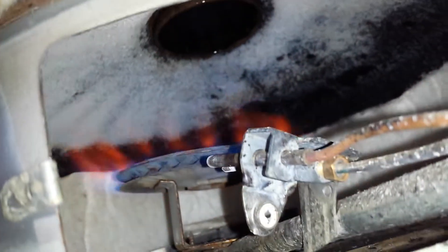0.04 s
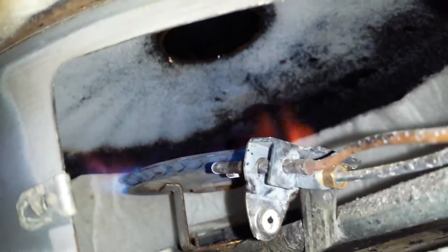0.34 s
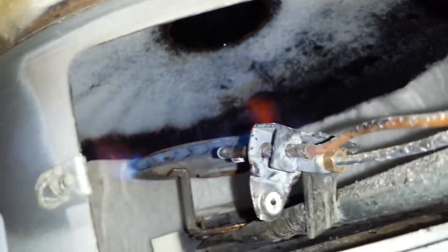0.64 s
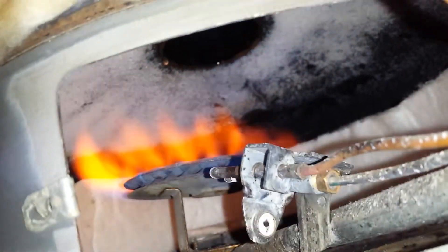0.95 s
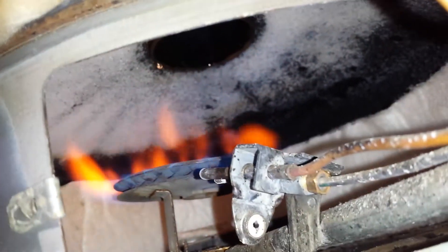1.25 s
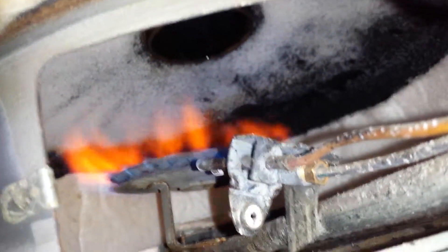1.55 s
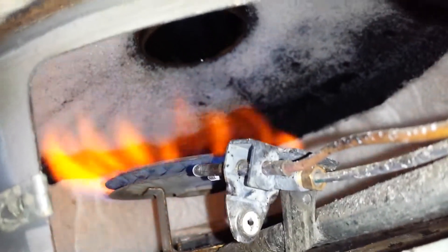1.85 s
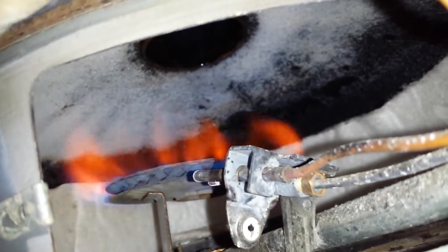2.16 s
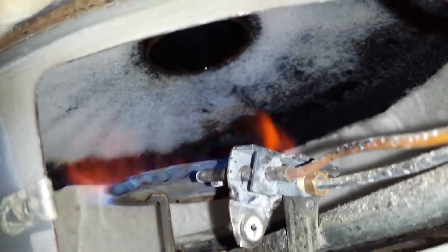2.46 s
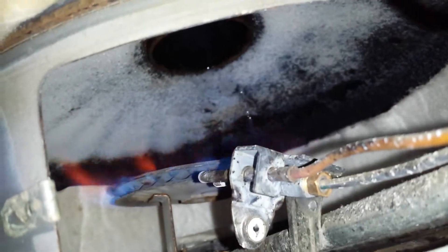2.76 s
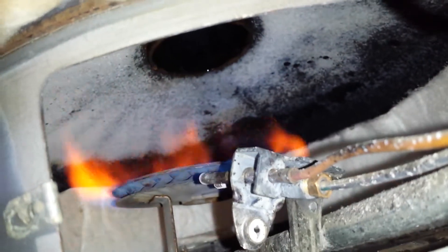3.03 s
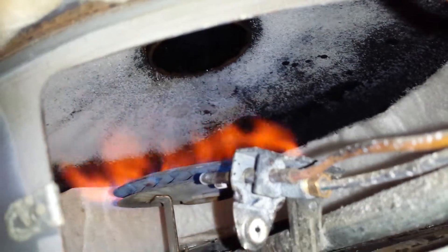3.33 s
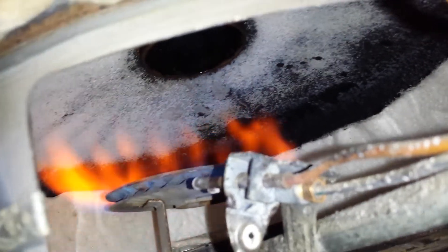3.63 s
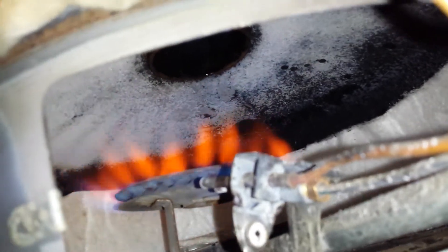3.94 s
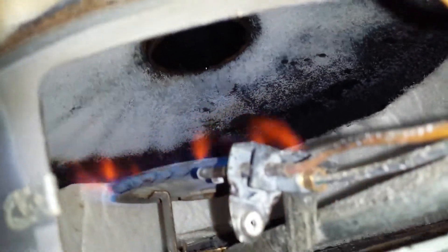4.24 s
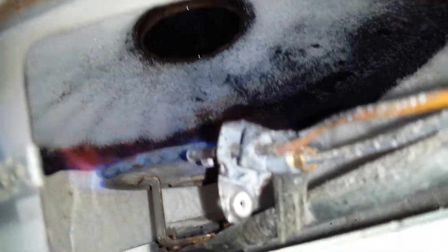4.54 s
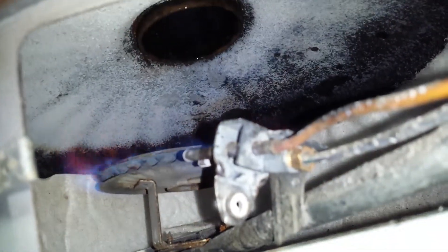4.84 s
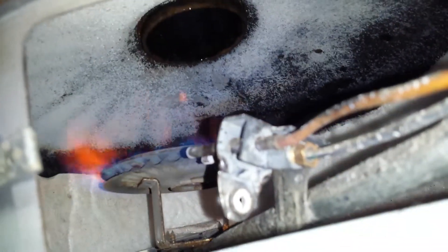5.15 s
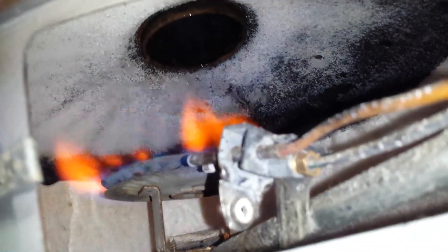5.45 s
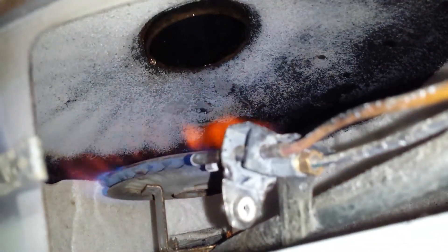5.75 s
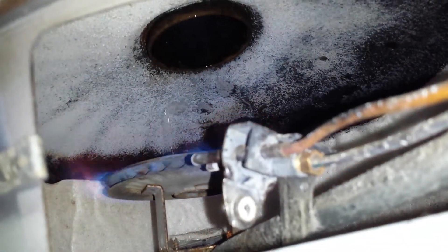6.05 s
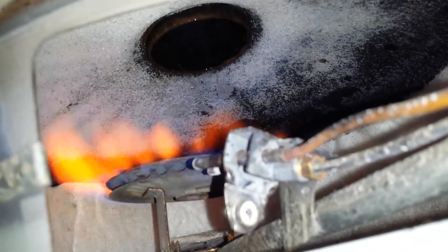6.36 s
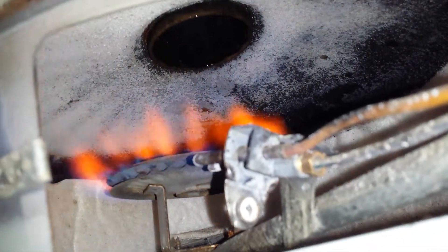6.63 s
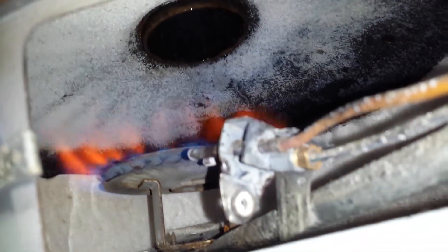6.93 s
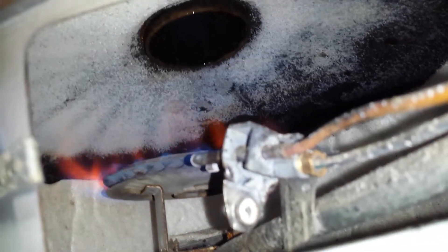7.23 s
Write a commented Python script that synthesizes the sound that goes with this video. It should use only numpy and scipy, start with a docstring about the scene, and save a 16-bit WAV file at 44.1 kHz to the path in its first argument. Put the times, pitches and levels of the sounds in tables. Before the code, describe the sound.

Water drips tick sharply and irregularly onto a hot gas burner, cutting through the deep, wavering rumble of its flames.

```python
"""Just outside the open combustion chamber of a gas water heater. The flames rumble in the
chamber's resonances over the hiss and whistle of the gas jet. Water drips onto the hot burner:
each drop spits, makes the flame thump, and boils away in a faint sizzle."""
import sys
import numpy as np
from scipy import signal
from scipy.fft import rfft, irfft, next_fast_len
from scipy.io import wavfile
from scipy.ndimage import uniform_filter1d, minimum_filter1d

SR = 44100
rng = np.random.default_rng(int(sys.argv[2]) if len(sys.argv) > 2 else 0)


def dump_mix(stems):
    """Bounce the given channels to the path in sys.argv[1] as a 16-bit WAV at rate SR."""
    frames = np.atleast_2d(stems).T  # one column per channel
    limited = np.clip(frames, -1, 1)  # hard clip at full scale
    pcm = np.round(limited * 32767).astype(np.int16)
    wavfile.write(sys.argv[1], SR, pcm)


N = 321489
TIME = np.arange(N) / SR
WALL_RIPPLE = rng.standard_normal((2, 400))  # one pattern per side, common to all sources

# Large drops. Each row: peak time in seconds, spit in dB, half length in seconds, thump in dB,
# treble in dB.
DROPS = [(0.012, -29, 0.0097, -19, -3), (0.094, -35, .005, -14, -2), (0.192, -31, 0.0077, -14.5, -7),
         (0.266, -34.5, 0.0056, -28, -5), (0.537, -33.5, 0.0098, -11.5, -3), (0.618, -34.5, .0023, -14, -7),
         (0.667, -25.5, .006, -6, -7), (0.737, -36.5, .0045, -14.5, -7), (0.876, -33, 0.0053, -13, -8),
         (1.025, -26, .003, -10, -6), (1.125, -33.5, 0.0039, -15.5, -7), (1.179, -28, 0.0069, -16, -3),
         (1.278, -33, .016, -8.5, 0), (1.371, -33, 0.0041, -16.5, -11), (1.503, -30.5, 0.0078, -19, -1),
         (1.604, -32.5, 0.0037, -17, -12), (1.694, -30.5, 0.003, -17.5, -5), (1.714, -27, 0.0034, -20, -9),
         (1.855, -28.5, 0.0028, -33, -5), (1.919, -35.5, 0.0034, -21.5, -1), (2.441, -30, 0.0027, -15, -5),
         (2.489, -35, 0.0062, -16.5, -10), (2.562, -37.5, 0.0047, -21.5, -8), (2.891, -34, 0.0023, -23, 3),
         (3.108, -31, 0.0058, -14, -4), (3.226, -29.5, 0.0065, -17, -1), (3.317, -28.5, 0.0024, -16, -11),
         (3.505, -30, 0.005, -11, -7), (3.589, -33, 0.0038, -13.5, -6), (3.729, -31.5, .01, -21, -0.5),
         (3.837, -28, 0.0077, -9.5, -6), (3.917, -29, .0022, -14.5, -5), (3.957, -30.5, .0063, -12, 1),
         (4.036, -33.5, 0.0025, -17.5, -7), (4.151, -26, 0.003, -11, -3), (4.795, -32, 0.0018, -47, -29),
         (5.015, -32.5, 0.014, -12.5, -6), (5.098, -32.5, 0.0097, -14, -7),
         (5.242, -27.5, 0.0064, -10, -11), (5.316, -30.5, 0.0056, -16.5, -8), (5.362, -30, 0.0056, -17, -8),
         (5.436, -32.5, 0.0042, -19, -7), (5.461, -30.5, 0.0051, -15.5, -15),
         (5.537, -33, 0.0031, -17, -18), (5.584, -28.5, 0.0081, -23, -6), (5.662, -36, .0097, -34, -6),
         (5.783, -29.5, 0.0051, -12, -10), (5.848, -31.5, 0.0021, -18, -7), (5.863, -30, 0.0022, -24, -11),
         (5.89, -32.5, 0.0069, -17, -7), (5.961, -32.5, 0.0037, -27, -9), (6.362, -29.5, .0022, -11.5, 0.5),
         (6.376, -33.5, .012, -14.5, -4), (6.466, -34.5, 0.0017, -13, -16), (6.982, -33.5, 0.01, -13.5, -6),
         (7.055, -36.5, 0.0048, -16, -13)]
# Flame strength. Each row: time in seconds, level in dB.
FLAME_STRENGTH = [(0.0, -19.5), (0.32, -14.5), (0.6, -20.5), (0.68, -18), (1.48, -14.5), (1.68, -10),
                  (2.08, -22.5), (2.48, -17.5), (2.84, -22.5), (3.4, -16), (4.68, -16.5), (4.8, -17),
                  (5.28, -16.5), (5.4, -14.5), (6.32, -18), (6.84, -15.5), (7.04, -24), (7.28, -22)]
# Boiling water. Each row: frequency in Hz, level in dB, left minus right in dB.
SIZZLE_SPECTRUM = [(4000, -26, -14), (7700, -4.5, -18.5), (12600, -2, -11.5), (15000, -10, -13.5)]


def gain_of(db):
    """Decibels to amplitude."""
    return 10 ** (np.asarray(db) / 20)


def follow(curve):
    """A time curve at every sample."""
    return np.interp(TIME, *np.transpose(curve))


def at_hz(rows, hz):
    """Columns of a spectrum table, interpolated over log frequency."""
    row_hz, *columns = np.transpose(rows)
    return np.array([np.interp(np.log(hz + 1), np.log(row_hz), column) for column in columns])


def add(mix, start_s, sound):
    """Mixes a stereo sound in from start_s on."""
    start = round(start_s * SR)
    sound = sound[:, max(-start, 0):]
    part = mix[:, max(start, 0):][:, :sound.shape[1]]
    part += sound[:, :part.shape[1]]


def mid_band(x, lo_hz, hi_hz):
    """Mean of both channels, band-passed."""
    hz = np.fft.rfftfreq(x.shape[1], 1 / SR)
    return irfft(rfft(x.mean(0)) * (hz > lo_hz) * (hz < hi_hz))


def wall_comb_db(hz, depth_db=2.0, step_hz=45):
    """Echoes between the sheet-metal walls finely comb the middle and treble."""
    reach = np.interp(hz, [500, 1800, 7500, 9500], [0, 1, 1, .4])
    teeth_hz = np.arange(WALL_RIPPLE.shape[1]) * step_hz
    return depth_db * reach * np.array([np.interp(hz, teeth_hz, side) for side in WALL_RIPPLE])


def chamber(spectrum, size):
    """Stereo response of a source in the chamber; minimum phase, so resonances ring after a blow."""
    # Resonances and dips. Each row: centre in Hz, width in Hz, gain in dB.
    modes = [(109.15, 23.5, 13), (160.2, 15.6, 12), (211.3, 16.9, 13.5), (283.8, 135, 21.5),
             (370.2, 9.6, 11), (423.2, 16, 14), (487.8, 12.4, 12.5), (563.5, 13.5, 9.5), (867, 69, 5.5),
             (1046, 374, -17.5), (1199, 128, 12.5), (1311, 150, 8.5), (1683, 194, 5.5), (1894, 166, 7),
             (2567, 250, 6.5), (3700, 150, -6.5), (4870, 35, 5), (5400, 110, 2.5), (6800, 55, 2),
             (7370, 150, 6)]
    hz = np.fft.rfftfreq(size, 1 / SR)
    source_db, balance_db = at_hz(spectrum, hz)
    modes_db = sum(db / (1 + (2 * (hz - centre) / width) ** 2) for centre, width, db in modes)
    cepstrum = irfft(np.log(gain_of(source_db + wall_comb_db(hz) + modes_db)), size)
    cepstrum[:, 1:size // 2] *= 2
    cepstrum[:, size // 2 + 1:] = 0
    return np.exp(rfft(cepstrum)) * gain_of([balance_db / 2, -balance_db / 2])


def stereo(noise, response):
    """Filters two noises so that left and right share the bass but differ in the treble."""
    # Each row: frequency in Hz, coherence from 0 to 1, lead of the left side in radians.
    likeness = [(300, 0.96, 0), (820, 0.88, 0), (1070, 0.46, 0.8), (1750, 0.64, 1.5), (2040, 0, -0.5),
                (3300, 0, -2.5), (4700, 0.4, -2), (5200, 0.5, -2.5), (7940, 0.1, 0)]
    left, other = rfft(noise)
    hz = np.fft.rfftfreq(noise.shape[1], 1 / SR)
    coherence, lead_rad = at_hz(likeness, hz)
    above_bass = hz ** 4 / (hz ** 4 + 200 ** 4)
    coherence = 1 - above_bass * (1 - np.clip(coherence, 0, 1))
    right = coherence * left + np.sqrt(1 - coherence ** 2) * other
    return irfft(response * np.array([left, right * np.exp(-1j * lead_rad * above_bass)]))


def turbulence(spectrum):
    """Steady noise ringing in the chamber, at least N samples long."""
    size = 2 * next_fast_len(N // 2 + 1)
    return stereo(rng.standard_normal((2, size)), chamber(spectrum, size))


def hiss(spectrum, level_db, flutter_db):
    """Turbulence that flutters about a given level."""
    noise = turbulence(spectrum)[:, :N]
    flutter = uniform_filter1d(rng.standard_normal(N), size=700)
    return noise / noise.mean(0).std() * gain_of(level_db + flutter_db * flutter / flutter.std())


def draught_db(share=0.5, smooth_s=0.51):
    """Flow of gas and air about its mean, slowly following the flames."""
    flame_db = uniform_filter1d(follow(FLAME_STRENGTH), round(smooth_s * SR), mode="nearest")
    return share * (flame_db - flame_db.mean())


def sizzle(rise_s=0.02, fall_s=0.052):
    """Water boils steadily on the hot metal, with brief puffs of steam."""
    # Each row: time in seconds, level in dB.
    boiling = [(0, -52), (1.55, -50), (2.05, -53.5), (3.2, -53.5), (4.5, -49), (6.2, -50), (6.5, -51),
               (7.29, -52)]
    # Each row: peak time in seconds, dB above the boiling.
    puffs = [(0.77, 3.5), (4.72, 5), (6.27, 4)]
    puffs_db = sum(db * np.exp(-.5 * ((TIME - peak_s) / np.where(TIME < peak_s, rise_s, fall_s)) ** 2)
                   for peak_s, db in puffs)
    return hiss(SIZZLE_SPECTRUM, follow(boiling) + puffs_db, flutter_db=1.0)


def snaps(decay_s=0.004):
    """Single sharp cracks of boiling water, equally loud on both sides."""
    # Each row: peak time in seconds, level in dB.
    cracks = [(1.503, -45), (2.893, -36), (3.229, -43)]
    bursts = sum(gain_of(db) * np.exp(-abs(TIME - peak_s) / decay_s) for peak_s, db in cracks)
    fizz = hiss(SIZZLE_SPECTRUM, 0, flutter_db=4.0)
    return bursts * fizz / fizz.std(axis=1, keepdims=True)


def gas_jet(rush_db=-43, high_mean_db=-53.5, trade=0.27):
    """The jet hisses with the draught; its high whistle fades as the low one grows."""
    # Three spectra. Each row: frequency in Hz, level in dB, left minus right in dB.
    rush = [(600, -12, 18.5), (1160, -6.5, -2), (1850, -5.5, 8), (2480, -5, 3.5), (3730, -1, 0),
            (4600, -3.5, -5), (5800, -0.5, 4), (8300, -6, 4), (8900, -34, -4), (13900, -36, -2)]
    low_whistle = [(3000, -32, 0), (3830, -17.5, -1), (4270, 5.5, -8.5), (4600, 3.5, 10), (5680, 2, 10),
                   (6440, -8.5, 12), (9000, -48, 0)]
    high_whistle = [(5000, -44.5, 0), (6520, -19, 10), (6830, 2, 10), (7270, -12.5, 12), (9000, -51, 0)]
    # Low whistle. Each row: time in seconds, level in dB.
    low_level = [(0, -44), (.45, -44), (.6, -50), (1.6, -52), (1.88, -46), (2.1, -52.5), (3.2, -52),
                 (3.8, -45), (4.4, -48.5), (7.29, -49.5)]
    low_db = follow(low_level)
    high_db = high_mean_db - trade * (low_db - low_db.mean())
    return (hiss(rush, draught_db() + rush_db, flutter_db=1.5)
            + hiss(low_whistle, low_db, flutter_db=2.5)
            + hiss(high_whistle, high_db, flutter_db=0.5))


def spray(count=38, mean_db=-38, spread_db=3, half_s=0.0029, thump_db=-26.5, treble_db=-5):
    """Fine spray lands at random and spits harder in a strong draught; rows as in DROPS."""
    flow_db = draught_db()
    rows = []
    for slot, (when, weight, length) in enumerate(rng.random((count, 3))):
        at = int((slot + when) / count * N)
        spit_db = mean_db + spread_db * (2 * weight - 1) + flow_db[at]
        rows.append((at / SR, spit_db, half_s * (.5 + length), thump_db, treble_db))
    return rows


def rebounds(mean_delay_s=0.014, half_s=0.0027):
    """Each drop breaks up and its remainder spits again, weaker and thinner; rows as in DROPS."""
    delays_s = mean_delay_s * (.5 + rng.random(len(DROPS)))
    return [(peak_s + delay_s, spit_db - 6.5, half_s, thump_db - 11, treble_db + 2)
            for (peak_s, spit_db, _, thump_db, treble_db), delay_s in zip(DROPS, delays_s)]


def drops(crackle_db=5.0, skew=0.095, eddy_s=0.007, lead_s=0.003904, churn=1.31, hold_s=0.037):
    """Each drop flashes to steam in a clump of tiny cracks, and the puff jolts the flame."""
    # Each row of both: frequency in Hz, level in dB, left minus right in dB.
    spit_spectrum = [(238, -29, 15), (502, -10, -1), (810, 2.5, 1.5), (1220, -6, 5), (1710, -10.5, 11),
                     (2080, -13, 5), (3000, -12, 1.5), (4160, -11, -0.5), (6960, -16.5, 4.5),
                     (9300, -28, -17.5), (14300, -53, -13)]
    thump_spectrum = [(62, -30.5, 7), (139, 5.5, -3), (219, -2.5, 3), (266, -4.5, 2.5), (363, -13.5, 1),
                      (597, -22.5, 0), (915, -23.5, 4), (1510, -76.5, 0)]
    size = 8192
    hz = np.fft.rfftfreq(size, 1 / SR)
    t = (np.arange(size) - size // 4) / SR
    spit_response, thump_response = chamber(spit_spectrum, size), chamber(thump_spectrum, size)
    treble = hz ** 4 / (hz ** 4 + 3300 ** 4)
    eddies = np.exp(-.5 * (t / eddy_s) ** 2)
    push = np.sinc((t + lead_s) * SR)
    out = np.zeros((2, N))
    for peak_s, spit_db, half_s, thump_db, treble_db in list(DROPS) + rebounds() + spray():
        noise = rng.standard_normal((5, size))
        cracks = uniform_filter1d(noise[4], size=30)
        clump = np.exp(-.5 * (t / (half_s * (1 + skew * np.sign(t)))) ** 2)  # rises faster than it dies
        clump *= gain_of(crackle_db * cracks / cracks.std())
        spit = stereo(noise[:2] * clump, spit_response * gain_of(treble_db * treble))
        spit *= np.sqrt(np.sqrt(np.pi) * half_s * SR / np.sum(mid_band(spit, 1100, 3500) ** 2))
        # one pressure pulse and the eddies it stirs up
        jolt = churn * noise[2:4] * eddies / np.linalg.norm(eddies) + [push, 0 * push]
        thump = stereo(jolt, thump_response)
        thump *= np.sqrt(hold_s * SR / np.sum(thump.mean(0) ** 2))  # energy of 0 dB held for hold_s
        add(out, peak_s + t[0], gain_of(spit_db) * spit + gain_of(thump_db - 1) * thump)
    return out


def billow_db(rate_hz=5.5, depth_db=2.5, count=16):
    """The flames sway at random, within an octave of rate_hz."""
    rates_hz = rate_hz * np.geomspace(.5, 2, count)
    sway = sum(np.sin(2 * np.pi * (hz * TIME + turn)) for hz, turn in zip(rates_hz, rng.random(count)))
    return depth_db * sway / sway.std()


def flames(deep_trim_db=-0.4, upper_gain_db=-17, split_hz=165, steadiness=0.76):
    """The deep resonances surge with the flames; the upper roar follows the draught."""
    # Each row: frequency in Hz, level in dB, left minus right in dB.
    roar_spectrum = [(25, -32, -3), (45.3, -11, 0.5), (86.6, 1.5, 0.4), (138, -6.5, 0.4), (195, -15, 1.5),
                     (286, -23, 3), (343, -28, 2.5), (490, -32, 0), (1030, -19.5, 3.5), (1207, -40, 4.5),
                     (2510, -52.5, 25.5), (5030, -62, 10)]
    roar = turbulence(roar_spectrum)
    bass_power = uniform_filter1d(mid_band(roar, 50, 150) ** 2, size=3500)[:N]
    roar = roar[:, :N] / np.sqrt(bass_power.mean())
    deep = signal.sosfiltfilt(signal.butter(3, split_hz, fs=SR, output="sos"), roar)
    levelling = (bass_power.mean() / bass_power) ** (steadiness / 2)
    surge = gain_of(follow(FLAME_STRENGTH) + billow_db() + deep_trim_db)
    return deep * levelling * surge + (roar - deep) * gain_of(upper_gain_db + draught_db())


def scene():
    """Gas jet, flames and water on the burner."""
    return gas_jet() + sizzle() + flames() + drops() + snaps()


def record(dry, ceiling=0.88, window_samples=600, cutoff_hz=14800):
    """Smooth peak limiter, then a low-pass."""
    allowed = np.minimum(1, ceiling / (abs(dry).max(0) + 1e-9))
    gain = uniform_filter1d(minimum_filter1d(allowed, window_samples), window_samples)
    lowpass = signal.firwin(511, cutoff_hz, window=("kaiser", 9), fs=SR)
    return signal.oaconvolve(dry * gain, lowpass[None], "same")


dry = scene()
out = record(dry)
dump_mix(out)
```